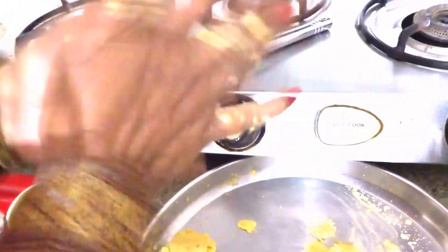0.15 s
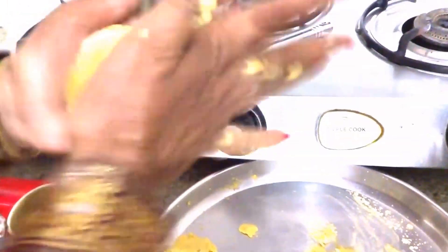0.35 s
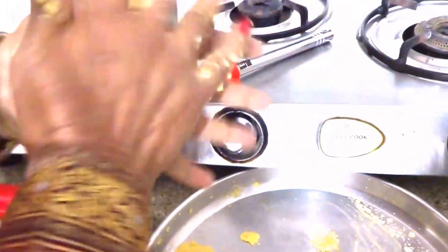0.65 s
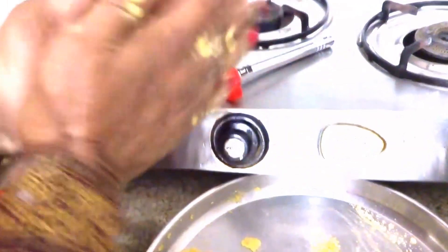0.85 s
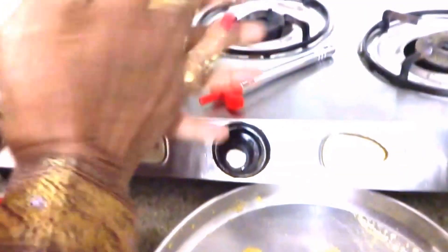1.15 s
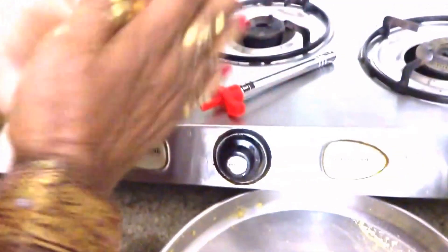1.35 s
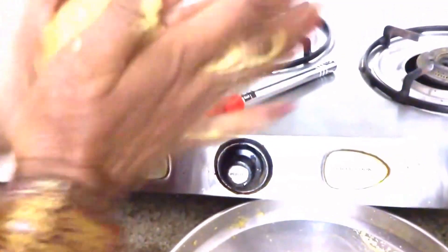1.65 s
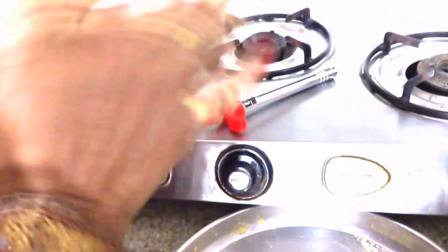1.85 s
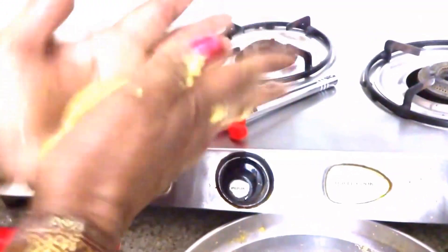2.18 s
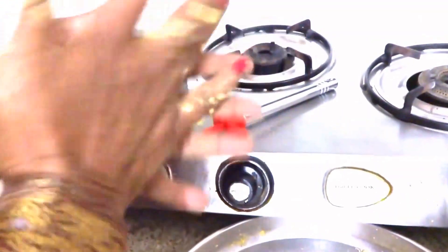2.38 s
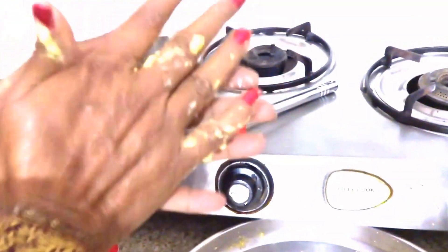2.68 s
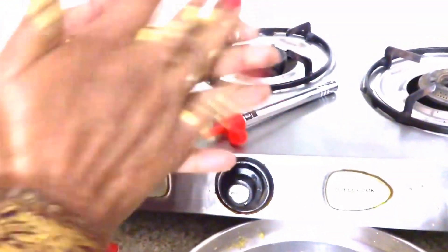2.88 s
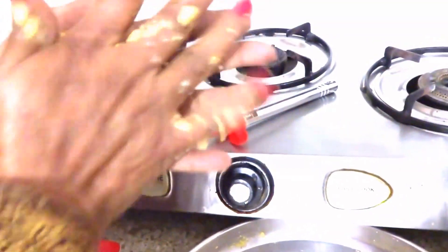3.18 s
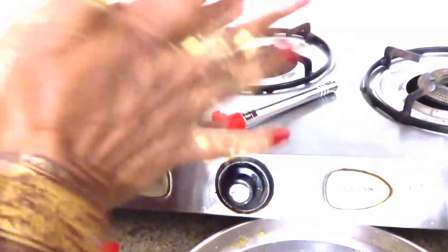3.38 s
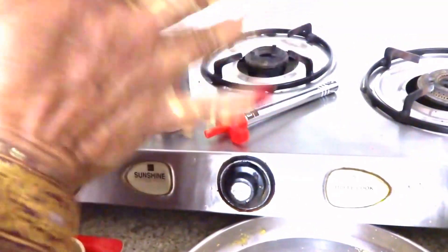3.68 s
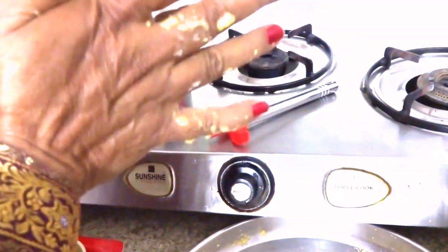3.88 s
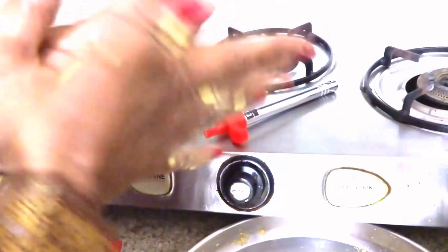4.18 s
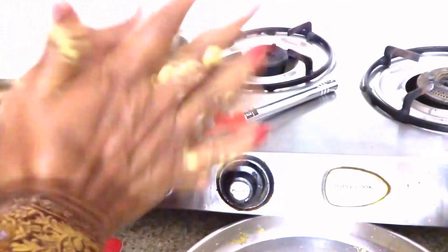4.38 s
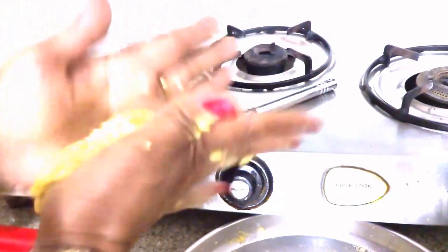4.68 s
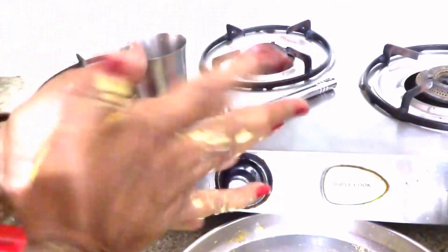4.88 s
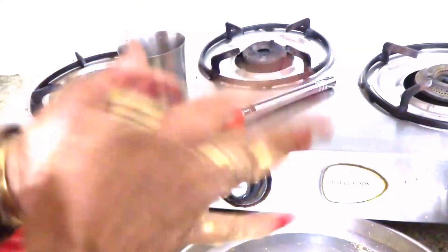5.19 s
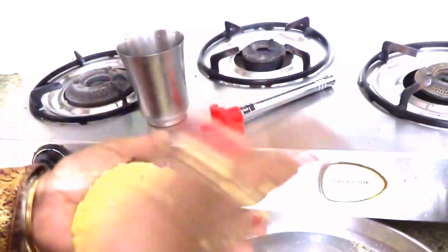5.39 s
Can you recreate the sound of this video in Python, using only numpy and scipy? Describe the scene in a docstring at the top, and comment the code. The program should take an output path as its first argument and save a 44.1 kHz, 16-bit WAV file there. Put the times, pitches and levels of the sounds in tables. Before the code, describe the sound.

Two hands pat soft dough flat very close to the microphone in a hard-walled kitchen. Slaps start soft, grow to a brisk steady run of about five per second, thin out mid-way, then return strongly and fade. Thin bangles tick and jingle between them, a single dry click sounds early, dough brushes lightly over skin, and quiet hiss lies beneath.

```python
"""Patting dough flat in a kitchen

Two hands pat a ball of soft dough flat, close to a camera in a hard-walled kitchen. Each slap is shaped
noise coloured by flesh, cupped palm, finger gaps and skin; metal bangles ring as sums of damped modes.
Dough slides as grainy hiss, one dry click sounds, and quiet hiss with a faint drone lies beneath.
The camera's limiter ducks the hard slaps, so the room swells up behind them."""
import sys
import numpy as np
from scipy import signal
from scipy.fft import rfft, irfft, next_fast_len
from scipy.io import wavfile
from scipy.ndimage import uniform_filter1d, minimum_filter1d

SR = 44100
rng = np.random.default_rng(int(sys.argv[2]) if len(sys.argv) > 2 else 0)


def master(y):
    """Save y as 16-bit WAV."""
    cut = np.clip(np.atleast_2d(y).T, -1, 1)
    pcm = np.round(cut * 32767)  # scale
    wavfile.write(sys.argv[1], SR, pcm.astype(np.int16))


N = 244314  # length in samples


def amp(db):
    """Logarithmic level: decibels become an amplitude gain."""
    return 10 ** (np.asarray(db) / 20)


def unit(x):
    """Normalisation: a signal or spectrum scaled to rms 1."""
    return x / np.sqrt(np.mean(np.abs(x) ** 2) + 1e-20)


def along(points, hz):
    """Interpolation on a log-frequency axis through (Hz, value) points."""
    point_hz, values = np.transpose(points)
    return np.interp(np.log(hz + 1), np.log(point_hz), values)


def add(track, s, sound):
    """Superposition: a sound is summed into a track from time s in seconds."""
    start = round(s * SR)
    sound = sound[..., max(-start, 0):max(N - start, 0)]
    first = max(start, 0)
    track[..., first:first + sound.shape[-1]] += sound


def filtered(x, response):
    """Linear filtering: the spectrum is multiplied by a response of frequency."""
    m = next_fast_len(N + SR // 2)
    hz = np.fft.rfftfreq(m, 1 / SR)
    return irfft(rfft(x, m) * response(hz), m)[..., :N]


def pocket(hz, centre_hz, q):
    """Damped resonance: gain peaks at the centre and falls off in steep skirts."""
    return 1 / (1 + (q * (hz / centre_hz - centre_hz / (hz + 1))) ** 2)


def causal(gain):
    """Causality: the minimum-phase spectrum of this gain puts all ring after the blow."""
    cepstrum = irfft(np.log(gain + 1e-6))
    half = len(cepstrum) // 2
    cepstrum[1:half] *= 2
    cepstrum[half + 1:] = 0
    return np.exp(rfft(cepstrum))


def stereo_noise(size):
    """Partial coherence: white noise nearly alike at two close microphones."""
    mid, side = rng.standard_normal((2, size)) * amp([[0], [-11.5]])
    return unit(np.array([mid + side, mid - side]))


# Hands landing on the dough. Each row: start in seconds, force in dB, palm cup pitch in Hz,
# finger gap pitch in Hz, air through the fingers in dB, skin crack in dB (both relative to the force),
# wall answer in dB relative to the direct sound.
PATS = [(0.0748, -18.5, 1120, 3400, 4.5, -12, -1), (0.1839, -17.5, 1130, 3600, 3, 8, -2),
        (.437, -1.5, 1060, 3970, -0.5, 4, -4), (0.654, 5, 1140, 3500, -0.5, -16, -3.5),
        (0.8641, 4.5, 1310, 2720, 1.5, -2, -5.5), (1.0674, 0.5, 1190, 2930, 1, 2, -4.5),
        (1.2904, 4.5, 1090, 2970, 2, 1.5, -5), (1.5206, 15.5, 1220, 2830, -3.5, -3, -1),
        (1.7366, 10.5, 1200, 3450, -1.5, -1.5, -6.5), (1.935, 5, 1447, 4170, 5.5, 4.5, 1.5),
        (2.1458, 11, 770, 2470, -8, -3.5, -3), (2.3417, 7, 990, 2690, 4.5, -10, -2),
        (2.5595, -2.5, 1350, 2640, -1, -1, -6), (3.39, -7.5, 1310, 2650, 1.5, 4.5, -0.5),
        (3.6964, -4, 1530, 3050, -5, 3.5, -4.5), (4.172, 7, 1410, 3320, -2, -2, -4.5),
        (4.4131, 16, 1055, 2400, -6, -14.5, -4.5), (4.6209, 9.5, 1220, 2800, -5, -13.5, -1.5),
        (4.8504, 7.5, 880, 2260, -12.5, -10, 0.5), (5.0644, 11, 1140, 3000, -10.5, -7.5, -2.5),
        (5.2904, -11, 1170, 2450, 0.5, -21, -2), (5.413, -25, 1220, 2170, 11.5, 6, -8.5)]
# Relative colour of the flesh thud. Each row: frequency in Hz, level in dB.
FLESH_COLOUR = [(45, -50), (110, -18), (195, -1.5), (310, -3), (500, -3.5), (950, -12.5), (3800, -65)]
# Relative colour of the skin crack. Each row: frequency in Hz, level in dB.
SKIN_COLOUR = [(550, -71), (2100, -12), (5200, 20), (8200, 18.5), (12500, 18.5), (15800, 15)]
# spread of the contacts of a 0 dB pat, and its slight growth in dB per dB of force
CONTACT_S, CONTACT_GROWS = 0.003, 0.07
# flesh thud of a 0 dB pat on the fresh ball, and dB gained per dB of force
THUD_DB, THUD_GROWS = -7.5, 0.58
# a hollower palm, ringing below this pitch, thuds more
THUD_CUP_HZ, THUD_DB_PER_OCTAVE = 1200, 6.5
THINNING_DB_PER_S = -1.39  # the thud fades as the dough gets thinner
GAP_EDGE = 1.56  # the finger gap passes little above this multiple of its pitch


def pats(patter_db=8.5, build=0.31, cup_q=1.15, gap_q=0.81, size=4096):
    """Impact excitation: one sharp push amid a patter of contacts, coloured by trapped air and flesh."""
    out = np.zeros((2, N))
    t = (np.arange(size) - size // 8) / SR
    hz = np.fft.rfftfreq(size, 1 / SR)
    push_force = t == 0
    for s, force_db, cup_hz, gap_hz, leak_db, crack_db, room_db in PATS:
        thud_db = THUD_DB + THUD_GROWS * force_db
        thud_db += THUD_DB_PER_OCTAVE * np.log2(THUD_CUP_HZ / cup_hz)
        thud_db += THINNING_DB_PER_S * s
        gap = pocket(hz, gap_hz, gap_q) / (1 + (hz / (GAP_EDGE * gap_hz)) ** 10)
        parts = [(thud_db, amp(along(FLESH_COLOUR, hz))),
                 (force_db, pocket(hz, cup_hz, cup_q)),
                 (force_db + leak_db, gap),
                 (force_db + crack_db, amp(along(SKIN_COLOUR, hz)))]
        colour = np.sqrt(sum((amp(db) * unit(shape)) ** 2 for db, shape in parts))

        # contacts gather quickly before the push and thin out after it
        spread = CONTACT_S * amp(CONTACT_GROWS * force_db)
        side_spread = spread * np.where(t < 0, build, 1)
        patter = rng.standard_normal(size) * np.exp(-np.abs(t / side_spread))
        full_force = push_force + amp(patter_db) * patter / np.linalg.norm(patter)

        body, loudness = causal(colour), np.sqrt(np.mean(colour ** 2))
        push = irfft(unit(rfft(push_force) * body)) * loudness
        slap = irfft(unit(rfft(full_force) * body)) * loudness
        # the walls gather sound from all directions, which evens out the patter;
        # only the direct sound keeps it
        heard = in_kitchen(push, room_db)
        heard[:, :size] += slap - push
        add(out, s + t[0], heard)
    return out


# Jolts of the wrist that knock the bangles together.
# Each row: start in seconds, level in dB, decay time of the rattle in seconds.
KNOCKS = [(0.171, -22, .026), (.375, -30, 0.014), (0.4775, -21, .02), (0.5914, -21.5, 0.015),
          (0.6142, -21, 0.027), (0.812, -26, 0.033), (.8982, -36.5, 0.03), (0.9667, -40.5, 0.018),
          (1.0577, -20, 0.024), (1.205, -27.5, 0.018), (1.2321, -28.5, 0.044), (1.4767, -25, 0.03),
          (1.698, -26.5, 0.019), (2.101, -31, 0.019), (2.328, -30, .025), (2.5195, -27.5, 0.017),
          (2.7264, -33, .014), (3.553, -24, 0.018), (3.847, -33.5, .015), (4.3434, -20.5, 0.019),
          (4.3573, -21.5, 0.026), (4.552, -32, .016), (4.6502, -25.5, 0.026), (4.8343, -28, 0.028),
          (5.043, -26, 0.031), (5.2826, -30, .018)]
# typical time to each after-knock, level drop to the first, random scatter of the log time
SETTLE_S, SETTLE_DB, SETTLE_SCATTER = .075, -13.5, .3


def bangles(answer_db=-2.0, count=2):
    """Dissipation: each jolt rings a pair of bangles, which settle in ever weaker after-knocks."""
    out = np.zeros((2, N))
    for s, db, rattle in KNOCKS:
        pair = (clink(rattle) + clink(rattle)) / np.sqrt(2)
        add(out, s, in_kitchen(amp(db) * pair, answer_db))
        waits = np.cumsum(SETTLE_S * np.exp(SETTLE_SCATTER * rng.standard_normal(count)))
        for k, wait in enumerate(waits, 1):
            after_db = db + SETTLE_DB * np.sqrt(k)
            add(out, s + wait, in_kitchen(amp(after_db) * clink(rattle), answer_db))
    wrist_side = amp([[0], [-1.8]])  # the second channel is a little weaker
    return out * wrist_side


# Nominal modes of the bangle metal, before scatter and wrist damping.
# Each row: frequency in Hz, level in dB, 60 dB decay time in seconds.
BANGLE_MODES = [(3612, -25, .17), (4590, -17, .17), (5828, -18, .13), (6080, -14, .13), (8690, -8, .07),
                (8805, -3, .09), (9712, -6, .12), (9935, -6, .12), (11405, -13, .1), (11647, -8, .1),
                (13545, -13, .07), (14035, -3, .07), (14135, 1, .06), (14281, 1, .1), (14538, -1, .09),
                (14925, -13, .1), (15195, -9, .1)]
BANGLE_DETUNE = 0.005  # no two bangles ring quite alike (random share of the pitch)
WRIST_DAMPING_DB_PER_S = 244  # skin and neighbours damp the ring


def clink(rattle, tick_db=0.0, first_size=0.41, count=16):
    """Modal vibration: a quick rattle of contacts, each ticking and ringing the damped metal."""
    t = np.arange(SR // 5) / SR
    hz, mode_db, t60 = np.transpose(BANGLE_MODES)[:, :, None]
    strength = amp(mode_db + 3.2 * rng.standard_normal(hz.shape))
    pitch = hz * (1 + BANGLE_DETUNE * rng.standard_normal(hz.shape))
    modes = strength * amp(-60 * t / t60) * np.sin(2 * np.pi * pitch * t)
    ring = np.sum(modes, axis=0) * amp(-WRIST_DAMPING_DB_PER_S * t)
    tick = amp(tick_db - 60 * t / .02) * rng.standard_normal(len(t))
    ring += np.diff(tick, prepend=0)  # differencing brightens the tick
    delays = np.append(0, 2 * rattle * rng.random(count))
    sizes = np.append(first_size, rng.random(count)) * np.exp(-delays / rattle)
    contacts = np.bincount((delays * SR).astype(int), sizes)
    sound = signal.fftconvolve(ring, contacts)[:len(t)]
    return sound / np.std(sound[:SR // 50])  # level set over the first 20 ms


# Strokes of dough over the palm. Each row: start in seconds, length in seconds, level in dB.
SLIDES = [(-.06, .14, -36), (0.703, 0.15, -41.5), (0.936, 0.087, -39), (2.771, 0.1, -45),
          (3.233, 0.11, -43), (3.589, 0.067, -37), (4.011, .13, -37.5), (4.229, 0.08, -31),
          (5.145, .11, -42.5)]
# Relative colour of the friction hiss. Each row: frequency in Hz, level in dB.
FRICTION_COLOUR = [(160, -9), (620, -9.5), (1450, -3), (3100, -6.5), (6100, -2), (11500, -1.5), (15800, -5)]


def slides(grain_db=2.5, room_db=-5.0):
    """Sliding friction: skin drags over floury dough, a grainy hiss that swells and fades."""
    stroke = np.zeros(N)
    for s, length, db in SLIDES:
        u = np.linspace(0, 1, int(length * SR))
        add(stroke, s, amp(db) * np.sqrt(np.abs(np.sin(np.pi * u))))
    grain = unit(uniform_filter1d(rng.standard_normal(N), size=90))
    grip = amp(grain_db * grain)
    hiss = filtered(grip * rng.standard_normal(N), lambda hz: amp(along(FRICTION_COLOUR, hz)))
    return in_kitchen(stroke * unit(hiss), room_db)[:, :N]


# Relative colour of the click. Each row: frequency in Hz, level in dB.
CLICK_COLOUR = [(200, -7), (1000, -13.5), (1900, 6), (3200, 0.5), (4700, 4), (6000, -9), (15000, -11)]
# time, level and wall answer of one dry click close to the microphone
CLICK_S, CLICK_DB, CLICK_ROOM_DB = .5487, 9, -19


def click(spread_s=0.00059, size=2048):
    """Near field: a single short snap whose direct sound far outweighs the walls."""
    out = np.zeros((2, N))
    t = (np.arange(size) - size // 8) / SR
    hz = np.fft.rfftfreq(size, 1 / SR)
    contact = rng.standard_normal(size) * np.exp(-np.abs(t / spread_s))
    snap = irfft(unit(rfft(contact) * causal(amp(along(CLICK_COLOUR, hz)))))
    add(out, CLICK_S + t[0], in_kitchen(amp(CLICK_DB) * snap, CLICK_ROOM_DB))
    return out


# Reverberation of the kitchen. Each row: frequency in Hz, 60 dB decay time in seconds.
WALL_DECAY = [(110, 0.39), (310, 0.89), (1250, 0.62), (3100, 0.61), (7200, 0.62), (14800, 0.36)]


def in_kitchen(sound, room_db, first_walls_s=0.00057):
    """Reverberation: direct sound plus a decaying wall answer, new each time as the hands move."""
    hz, t, z = signal.stft(stereo_noise(SR * 3 // 4), SR, nperseg=256)
    fade = amp(-60 * t / along(WALL_DECAY, hz)[:, None])
    onset = 1 - np.exp(-t / first_walls_s)
    tail = signal.istft(z * fade * onset, SR, nperseg=256)[1]
    path = amp(room_db) * tail / np.linalg.norm(tail[0])
    path[:, 0] += 1  # direct sound
    return signal.fftconvolve(sound[None], path, axes=1)


# Relative colour of the steady room hiss. Each row: frequency in Hz, level in dB.
HISS_COLOUR = [(15, -46), (25, -11), (64, -6.5), (96, -1), (126, -3.5), (255, -19.5), (392, -13),
               (905, -11.5), (1090, -1), (1320, -15), (1470, 3), (1730, -12), (15800, -21.5)]
# Stereo width of the room hiss. Each row: frequency in Hz, side minus mid in dB.
HISS_WIDTH = [(60, -11), (110, -22), (200, 10.5), (380, 9.5), (700, 8), (1290, 0.5), (2380, 6),
              (4400, -4.5), (8120, -8), (15000, -16)]
# Narrow bands in the room noise. Each row: centre in Hz, width in Hz, level in dB.
DRONE = [(103, 37, -73), (273, 108, -62), (1140, 110, -65)]


def room_noise(hiss_db=-52.5):
    """Stationary noise: quiet steady hiss, with narrow resonant bands as a faint drone."""
    mid, side = filtered(rng.standard_normal((2, N)), lambda hz: amp(along(HISS_COLOUR, hz)))
    side = filtered(side, lambda hz: amp(along(HISS_WIDTH, hz)))
    out = amp(hiss_db) * np.array([mid + side, mid - side]) / np.std(mid)
    for centre_hz, width_hz, db in DRONE:
        q = centre_hz / width_hz
        band = filtered(stereo_noise(N), lambda hz: pocket(hz, centre_hz, q))
        out += amp(db) * unit(band)
    return out


def scene():
    """Superposition of hands, click, bangles, sliding dough and room."""
    return pats() + click() + bangles() + slides() + room_noise()


def limiter(x, size=32):
    """Dynamic compression: gain drops at once under a peak and climbs back steadily."""
    ceiling_db, recovery_db_per_s = -1, 180
    over = np.maximum(20 * np.log10(np.abs(x).max(axis=0) + 1e-9) - ceiling_db, 0)
    climb = recovery_db_per_s * np.arange(N) / SR
    cut = np.maximum.accumulate(over + climb) - climb
    held = minimum_filter1d(-cut, size=size)
    return x * amp(uniform_filter1d(held, size=size))


def record(dry, top_hz=15900):
    """Band limitation: the camera limits peaks, then cuts steeply above its top frequency."""
    return filtered(limiter(dry), lambda hz: 1 / (1 + (hz / top_hz) ** 120))


dry = scene()
out = record(dry)
master(out)
```